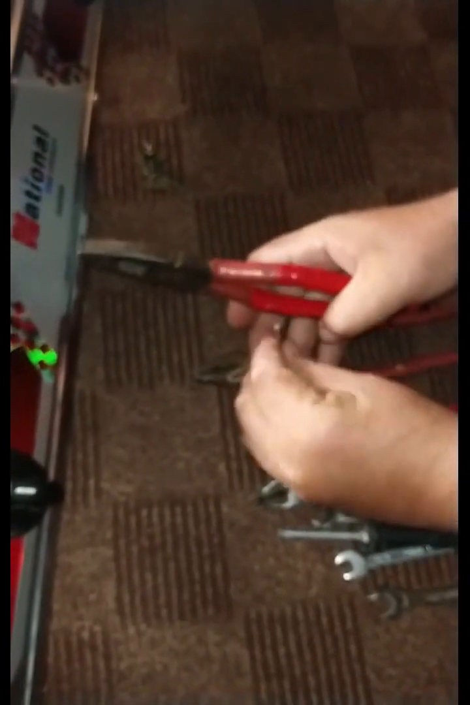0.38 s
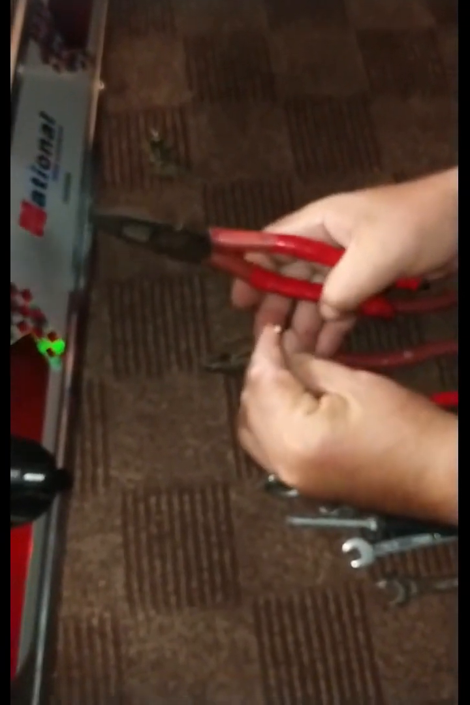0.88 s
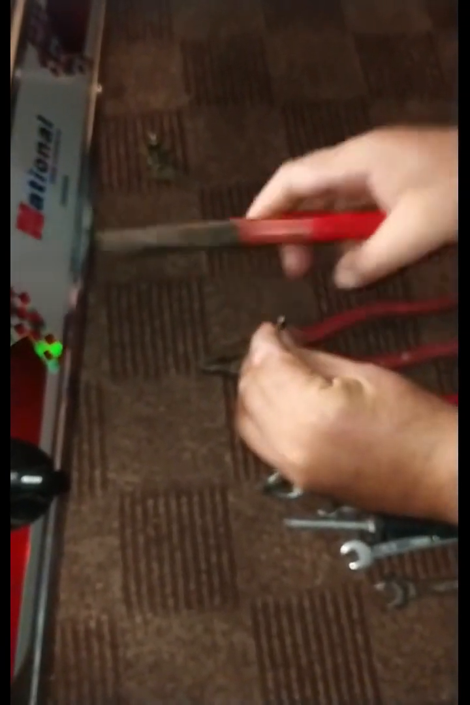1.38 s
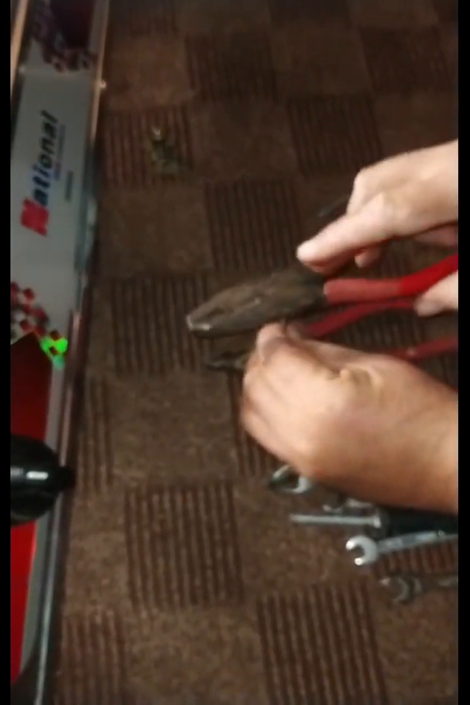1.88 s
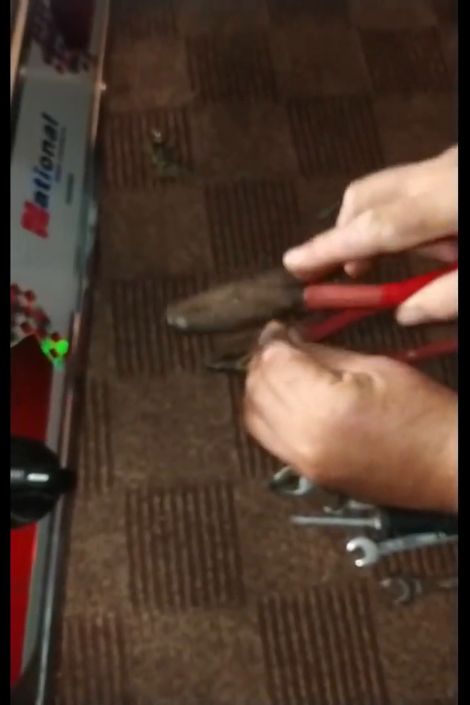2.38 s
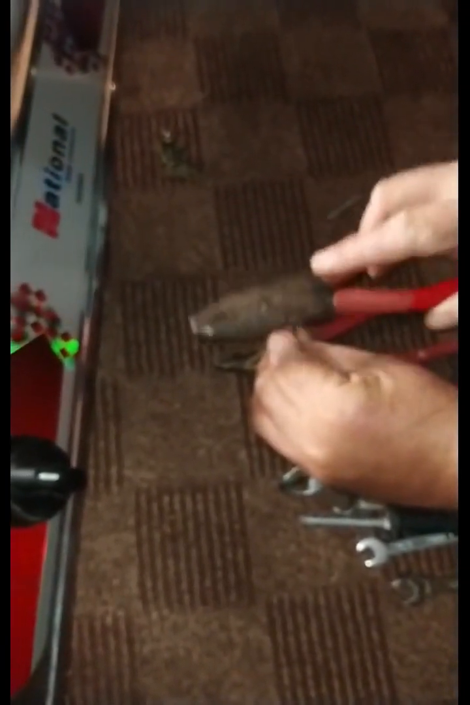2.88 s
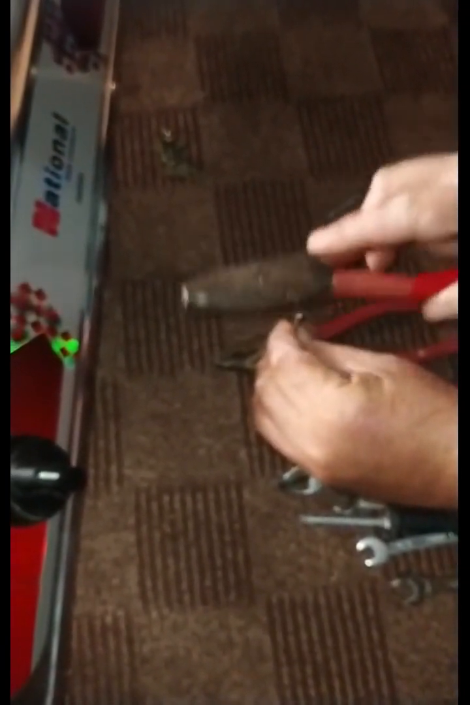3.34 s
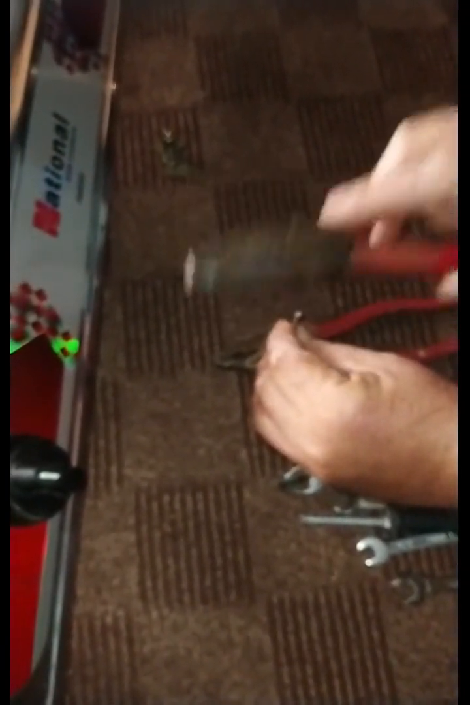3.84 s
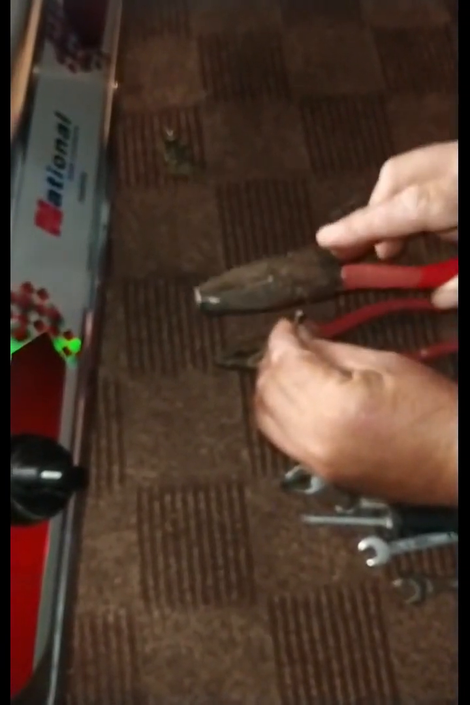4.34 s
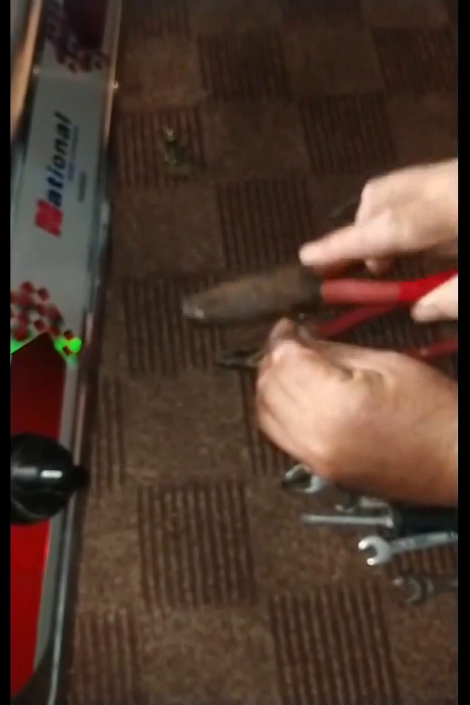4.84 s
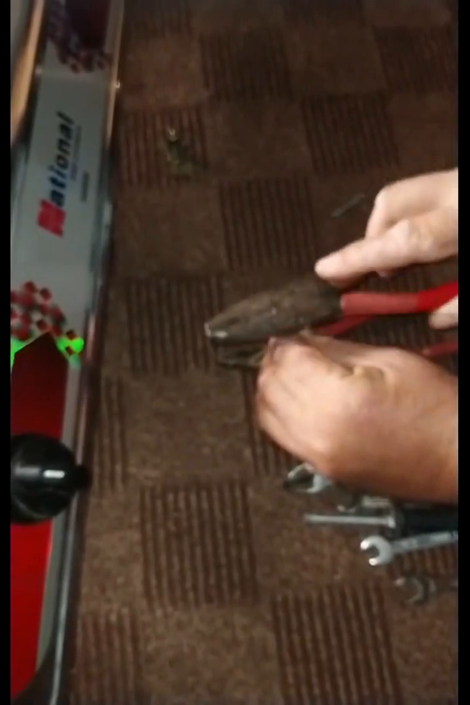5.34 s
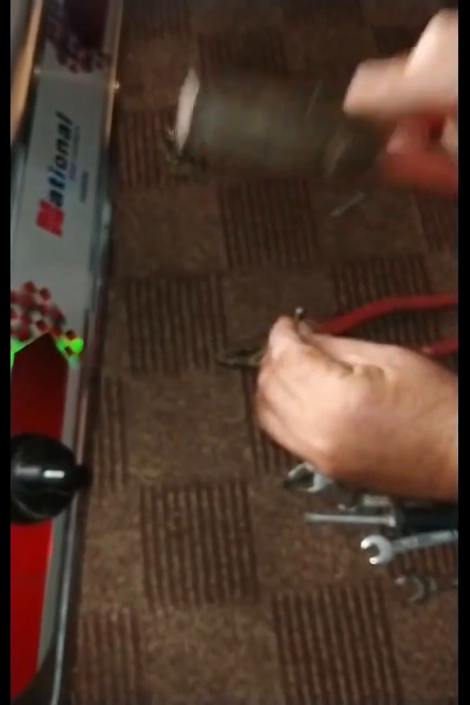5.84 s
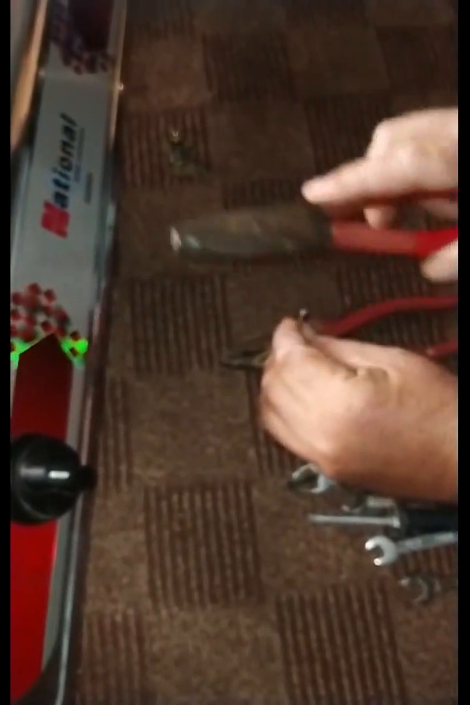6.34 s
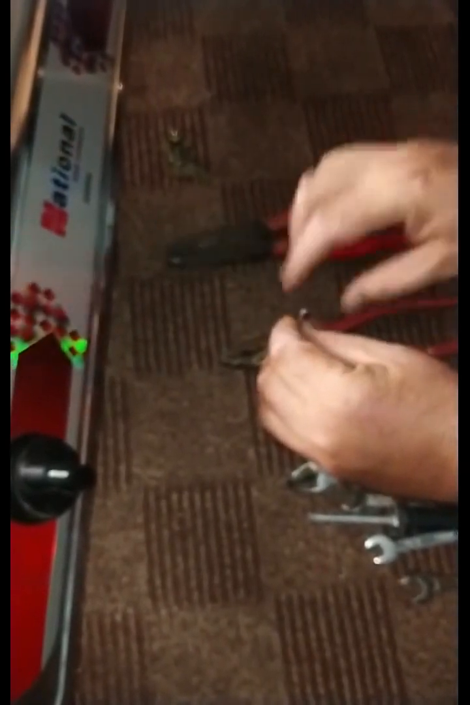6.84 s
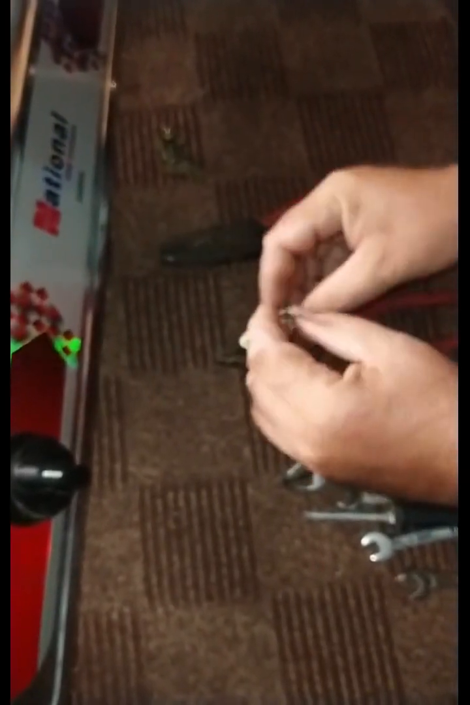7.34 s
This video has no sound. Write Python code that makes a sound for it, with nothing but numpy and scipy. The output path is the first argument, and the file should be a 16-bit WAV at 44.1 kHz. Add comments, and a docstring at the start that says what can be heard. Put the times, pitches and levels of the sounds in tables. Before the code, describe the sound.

Indoors, close to a phone, steel pliers strike a nail held on a metal part lying on carpet. After two quiet seconds with barely audible ticks come a few moderate taps, then four hard cracks about a second apart with weaker contacts between. Each has a dry floor thump, short steel ring and loose rattle. Finally the tool is put down with a clink and faint finger rubbing. A soft fan rumbles throughout.

```python
"""A fan rumbles and hums elsewhere in the building: shaped noise that breathes, with narrow noise bands.
Then steel pliers touch and tap a nail held upright on a metal part on a carpeted floor, close to a phone:
decaying modes of floor and steel, with a noisy crack and a rattle of loose parts.
Handling of pliers and parts adds small ticks, dull knocks and rubbing (bursts and strokes of noise);
ceiling and walls answer with discrete echoes and a diffuse tail."""
import sys
import numpy as np
from scipy import signal
from scipy.fft import rfft, irfft, next_fast_len
from scipy.io import wavfile
from scipy.ndimage import map_coordinates

SR = 44100
rng = np.random.default_rng(int(sys.argv[2]) if len(sys.argv) > 2 else 0)


def unload_wav(signal):
    """Save mono or channel-first audio to the path in sys.argv[1] as 16-bit WAV at rate SR, clipped to [-1, 1]."""
    wavfile.write(
        sys.argv[1],
        SR,
        np.round(np.clip(np.atleast_2d(signal).T, -1, 1) * 32767).astype(np.int16),
    )


def voltage_ratio(decibels):
    """Convert decibels (scalar or array-like) to amplitude ratios, 20 dB per decade."""
    exponent = np.asarray(decibels, float) / 20
    return 10 ** exponent


N = 329307  # length in samples
CONTACT_T = np.arange(SR // 8) / SR  # time after a contact, s


def unit(x):
    """Energy normalisation: scale to rms 1."""
    return x / np.sqrt(np.mean(x ** 2) + 1e-20)


def along(points, hz):
    """Logarithmic frequency scale: read (f/Hz, value) points, straight between them in log f."""
    f, v = np.transpose(points)
    return np.interp(np.log(hz + 1), np.log(f + 1), v)


def level(rows):
    """Amplitude envelope: gain per sample from (t/s, level/dB) rows, -120 dB outside them."""
    s, db = np.transpose(rows)
    return voltage_ratio(np.interp(np.arange(N) / SR, s, db, -120, -120))


def wobble(rate):
    """Slow random modulation: a smooth curve through rate random knots a second."""
    knots = rng.standard_normal(int(N * rate / SR) + 4)
    return map_coordinates(knots, [np.arange(N) * rate / SR])


def filtered(x, response):
    """Linear filtering: the spectrum of x times a response of frequency."""
    m = next_fast_len(len(x) + 8192)
    spectrum = rfft(x, m) * response(np.fft.rfftfreq(m, 1 / SR))
    return irfft(spectrum, m)[:len(x)]


def ringing(hz, gain, t60, t):
    """Modal superposition: a sum of exponentially decaying sines."""
    decay = voltage_ratio(-60 * t / t60[:, None])
    return gain @ (decay * np.sin(2 * np.pi * hz[:, None] * t))


# slow course of the air rumble: (t/s, level/dB), before its random breathing
FAN_LEVEL = [(0, -46), (2, -46.5), (3.6, -45), (7.47, -44.5)]
# relative spectrum of the air rumble: (f/Hz, level/dB per Hz)
AIR_SPECTRUM = [(18, -73), (30, -41.5), (55, -17.5), (107, -4.5), (201, -1.5), (261, -10), (298, -6.5),
                (323, -11), (467, -2.5), (608, -7), (772, -7), (1270, -14), (2300, -25), (3500, -33),
                (4050, -39), (7500, -46.5), (11400, -57.5), (16500, -64)]
# narrow hums: (f/Hz, rms level/dB, half-width at half amplitude/Hz)
HUMS = [(195, -60, 4), (441, -59, 17), (1084, -79.5, 8.8)]


def fan():
    """Broadband flow noise with slow amplitude modulation, and narrow-band noise heard as unsteady hums."""
    air = unit(filtered(rng.standard_normal(N), lambda hz: voltage_ratio(along(AIR_SPECTRUM, hz))))
    breathing_db = -0.5 + 0.48 * wobble(2.5) + 1.3 * wobble(19)
    out = air * level(FAN_LEVEL) * voltage_ratio(breathing_db)
    for hz, db, width in HUMS:
        hum = filtered(rng.standard_normal(N), lambda f: 1 / (1 + ((f - hz) / width) ** 2))
        out += voltage_ratio(db) * unit(hum)
    return out


TILT_HZ = 6000  # pivot of the brightness tilt
RING_OCTAVES, RING_DB = 0.27, 5.5  # 1/e half-width and height of the strongest ring


def steel_colour(ring_db, tilt, ring_hz):
    """Position-dependent excitation: where the blow lands favours one ring; returns dB as a function of Hz."""
    def colour(hz):
        hz = np.clip(hz, 2500, 14000)
        peak = np.exp(-(np.log2(hz / ring_hz) / RING_OCTAVES) ** 2)
        return ring_db + tilt * np.log2(hz / TILT_HZ) + RING_DB * peak
    return colour


# modes of pliers, nail and part: (f/Hz, level/dB added to the colour of the contact, t60/s)
STEEL_MODES = [(2764, -22.5, 0.029), (3043, -14, 0.014), (3530, -20.5, 0.017), (4790, -22.5, 0.024),
               (5370, -29.5, 0.024), (5360, -18, 0.02), (6210, -21, .012), (7000, -25.5, 0.0064),
               (7400, -24.5, 0.017), (8250, -26.5, 0.0064), (10080, -22, 0.009), (10600, -39, 0.016),
               (14900, -30.5, .009)]


def steel_ring(colour):
    """Modal vibration of steel: repeated micro-contacts excite the same decaying modes anew."""
    hz, db, t60 = np.transpose(STEEL_MODES)
    late = np.maximum(CONTACT_T - 0.0005, 0)  # the steel lets go just after the push
    sign = rng.choice([-1, 1], len(hz))
    strength = sign * voltage_ratio(db + colour(hz) + rng.normal(0, 0.5, len(hz)))
    # micro-contacts inside the first milliseconds smear the attack
    chatter = rng.standard_normal(200) * voltage_ratio(-60 * CONTACT_T[:200] / 0.004)
    chatter[0] += 9  # the main contact
    chatter /= np.linalg.norm(chatter)
    return np.convolve(ringing(hz, strength, t60, late), chatter)[:len(CONTACT_T)]


# broad humps of the crack: (f/Hz, level/dB added to the colour of the contact)
CRACK_HUMPS = [(1300, -45), (1900, -15), (3000, -10.5), (4000, -13.5), (5300, -11.5), (6400, -13),
               (9000, -16), (12200, -18.5), (14500, -19.5), (17000, -34)]


def crack_response(colour):
    """Spectral envelope of dense modes: the colour of the contact plus broad humps, as gain over Hz."""
    return lambda hz: voltage_ratio(colour(hz) + along(CRACK_HUMPS, hz))


def steel_crack(humps):
    """High modal density: countless short modes between the strong ones merge into a decaying noise."""
    t = CONTACT_T
    onset = 1 - np.exp(-(t / 0.00063) ** 2)
    noise = rng.standard_normal(len(t)) * voltage_ratio(-60 * t / 0.022) * onset
    return filtered(noise, humps)


# each contact of pliers on nail: (t/s, floor thump level/dB, steel level/dB,
# brightness/dB per octave, strongest ring f/Hz)
BLOWS = [(2.1000, -27, -28, 3.5, 5600), (2.478, -11.5, -16, 5.5, 7000), (2.4814, -49, -14, -0.5, 7000),
         (2.9488, -18.5, -18, 1.5, 3000), (2.951, -34.5, -18.5, -4.5, 2950), (2.953, -26, -26.5, 4, 5200),
         (3.3941, -1.5, -4, 0, 5330), (3.4263, -22, -18.5, -0.5, 3000), (4.0851, -2.5, -2, 1.5, 6210),
         (4.0867, -33, -7.5, -1.5, 3470), (4.9620, -4, -1.5, -0.5, 5330), (5.5104, -30, -38.5, -2, 3000),
         (5.7436, -31.5, -33, -2, 7000), (6.2943, -1, -4.5, 2, 5170)]
# steel touching steel in the hand, off the floor: (t/s, steel level/dB, brightness/dB per octave,
# strongest ring f/Hz)
TOUCHES = [(0.403, -47, -5, 3100), (.648, -47, 0, 3400), (6.8682, -20, 4.5, 7300), (7.182, -30, -7.5, 3590)]


def contacts():
    """Impact excitation and directivity: returns the sound at the phone and the less tonal sound to the room."""
    near, away, t = np.zeros(N + SR), np.zeros(N + SR), CONTACT_T
    impacts = [(*blow, 1) for blow in BLOWS]
    impacts += [(s, -120, *rest, 0) for s, *rest in TOUCHES]
    for s, thump_db, ring_db, tilt, ring_hz, on_floor in impacts:
        colour = steel_colour(ring_db, tilt, ring_hz)
        humps = crack_response(colour)
        thud = floor_thud(thump_db, ring_db, on_floor)
        ring = steel_ring(colour)
        # summed over all directions the crack is an even click
        click = filtered(1. * (np.arange(len(t)) == 60), humps)
        start = round(s * SR)
        near[start:][:len(t)] += thud + ring + steel_crack(humps) + rattle(thump_db, humps)
        # harder blows drive more of the floor and carry further
        reach = voltage_ratio(0.46 * thump_db)
        away_thud = reach * voltage_ratio(7.5) * thud * voltage_ratio(-60 * t / 0.011)
        away_click = voltage_ratio(20.5 + 0.15 * ring_db) * click
        away[start:][:len(t)] += away_thud + voltage_ratio(-23.5) * ring + away_click
    return near[:N], away[:N]


# decay of the diffuse tail: (f/Hz, t60/s)
ROOM_DECAY = [(100, 0.53), (260, 0.7), (700, 0.22), (1800, .27), (5500, 0.35), (13000, 0.29)]
# gain of the whole room answer: (f/Hz, level/dB)
ROOM_GAIN = [(60, -6), (150, 0.5), (350, -6), (800, -7), (1500, -10.5), (2200, -4.5), (3000, -5),
             (4200, -12.5), (6000, -14), (8000, -16.5), (11000, -17.5), (15000, -29)]
# first echoes: (delay t/s, level/dB against a tail of unit energy)
WALL_ECHOES = [(0.0113, -18), (0.0195, -6), (.0222, -12), (0.025, -19)]
# the rooms beyond keep the lower tones longer
LINGER_DB, LINGER_T60_S, LINGER_HZ = -15.5, 1.2, 1500


def room(x):
    """Early reflections and diffuse reverberation: a tail that builds up, then decays at a rate set by frequency.
    The tail is redrawn for each third of a second of sound."""
    out, step = np.zeros(N + 3 * SR), SR // 3
    for start in range(0, N, step):
        hz, t, z = signal.stft(rng.standard_normal(SR), SR, nperseg=256)
        decay = voltage_ratio(-60 * t / along(ROOM_DECAY, hz)[:, None])
        linger = voltage_ratio(LINGER_DB - 60 * t / LINGER_T60_S) / (1 + (hz[:, None] / LINGER_HZ) ** 2)
        tail = signal.istft(z * (decay + linger), SR, nperseg=256)[1]
        tail = tail * (1 - np.exp(-(np.arange(len(tail)) / SR / 0.0075) ** 2))  # build-up
        tail = tail / np.linalg.norm(tail)
        for delay, db in WALL_ECHOES:
            tail[round(delay * SR)] += voltage_ratio(db)
        answer = signal.fftconvolve(x[start:start + step], tail)
        out[start:start + len(answer)] += answer
    return filtered(out[:N], lambda hz: voltage_ratio(along(ROOM_GAIN, hz)))


# small ticks and dull knocks around the handling of pliers and parts:
# (t/s, peak level/dB, centre f/Hz, t60/s before the filter)
TICKS_AND_KNOCKS = [(0.914, -59, 8500, 0.007), (.962, -62, 7000, 0.0089), (2.225, -66, 11900, 0.012),
                    (5.7427, -29, 910, 0.014), (6.888, -33, 1000, 0.0083), (6.9, -46, 5270, 0.029),
                    (6.902, -50, 2870, 0.069), (6.9369, -38, 5000, 0.008), (6.944, -50, 2850, 0.049),
                    (6.971, -53, 6550, 0.0074), (7.040, -61, 3970, .015), (7.054, -56, 6500, 0.01),
                    (7.207, -69, 7000, 0.0071)]


def handling_ticks():
    """Time-bandwidth reciprocity: decaying noise ticks and knocks, narrower in band the longer they ring."""
    out, t = np.zeros(N + SR), np.arange(SR // 20) / SR
    for s, db, hz, t60 in TICKS_AND_KNOCKS:
        tick = rng.standard_normal(len(t)) * voltage_ratio(-60 * t / t60)
        tick = filtered(tick, lambda f: np.exp(-(np.log((f + 1) / hz) * t60 / 0.0018) ** 2))
        out[round(s * SR):][:len(t)] += voltage_ratio(db) * tick / np.abs(tick).max()
    return out[:N]


# floor under the part: (f/Hz, level/dB added to that of the blow, t60/s, direction of first swing)
FLOOR_MODES = [(141, -20, 0.12, -1), (238, -3, 0.011, 1), (308, -11.5, 0.063, -1), (430, -19, 0.137, -1),
               (520, -6.5, 0.017, -1), (604, -32.5, 0.066, 1), (733, -36, 0.46, 1), (825, -19, 0.033, -1),
               (1144, -18.5, 0.025, 1), (1304, -9, 0.0096, 1), (1521, -16.5, 0.019, 1)]
KNOCK_HZ = 800  # from here up the floor modes answer both the push and the sharp contact
KNOCK_OVER_THUMP_DB, KNOCK_OVER_STEEL_DB = -0.5, -3


def floor_thud(thump_db, ring_db, on_floor):
    """Modal response to an impulse: each push starts the floor modes the same way; carpet damps the treble."""
    hz, db, t60, swing = np.transpose(FLOOR_MODES)
    knock_db = max(thump_db + KNOCK_OVER_THUMP_DB, ring_db + KNOCK_OVER_STEEL_DB)
    drive_db = np.where(hz < KNOCK_HZ, thump_db, knock_db)
    push = on_floor * np.sign(swing) * voltage_ratio(db + drive_db)
    carpet = signal.butter(2, 2600 / (SR / 2))  # low-pass, Hz
    return signal.lfilter(*carpet, ringing(hz, push, t60, CONTACT_T))


# loose parts jump after a full blow; the level is added to that of the thump and the crack colour
RATTLE_DB, RATTLE_T60_S, RATTLE_PER_S, RATTLE_TOP_HZ = 3.5, 0.16, 970, 7000


def rattle(thump_db, humps):
    """Random impact process: sparse impulses of decaying size, coloured as the crack but duller."""
    t = CONTACT_T
    jumps = (rng.random(len(t)) < RATTLE_PER_S / SR) * rng.standard_normal(len(t))
    jumps = jumps * voltage_ratio(-60 * t / RATTLE_T60_S)
    duller = lambda hz: humps(hz) / (1 + (hz / RATTLE_TOP_HZ) ** 4)
    return voltage_ratio(RATTLE_DB + thump_db) * filtered(jumps, duller)


# fingers rubbing the parts: (t/s at which the rise ends, hold/s, level/dB)
RUB_STROKES = [(6.87, 0.033, -59.5), (7.03, 0.14, -65.5)]
# relative spectrum of the rubbing: (f/Hz, level/dB per Hz)
RUB_SPECTRUM = [(800, -22), (1500, 5), (2400, 0), (3800, 5), (7000, -4), (13000, -41), (17000, -38)]
RUB_RISE_S, RUB_FADE_S = 0.016, 0.038  # linear rise, 1/e time of the fade


def finger_rub():
    """Friction noise: grainy coloured noise under strokes that rise, hold and fade."""
    grain = rng.standard_normal(N) * voltage_ratio(2.5 * wobble(150))
    rub = unit(filtered(grain, lambda hz: voltage_ratio(along(RUB_SPECTRUM, hz))))
    t, strokes = np.arange(N) / SR, np.zeros(N)
    for s, hold, db in RUB_STROKES:
        rise = np.clip((t - s) / RUB_RISE_S + 1, 0, 1)
        fade = np.exp(-np.maximum(t - s - hold, 0) / RUB_FADE_S)
        strokes += voltage_ratio(db) * rise * fade
    return strokes * rub


def scene():
    """Superposition: the fan, the work at hand and the answer of its room add linearly."""
    near, away = contacts()
    handling = handling_ticks() + finger_rub()
    answer = room(away + voltage_ratio(-9.0) * handling)
    return (fan() + near + handling + answer)[None]


def band_limit(x):
    """A steep low-pass at the top of the band."""
    return signal.sosfilt(signal.butter(12, 17030, fs=SR, output="sos"), x)


def record(dry):
    """Saturation and band limiting: the phone's input rounds the peaks, then loses deep bass and top treble."""
    top = 1  # amplitude at which the input saturates
    saturated = dry[0] / (1 + np.abs(dry[0] / top) ** 4) ** (1 / 4)
    bass_cut = signal.butter(2, 55 / (SR / 2), "high")
    heard = signal.lfilter(*bass_cut, saturated)
    heard = filtered(heard, lambda hz: np.clip((16900 - hz) / 900, 0, 1))  # fades out from 16000 to 16900 Hz
    return band_limit(heard[None])


dry = scene()
out = record(dry)
unload_wav(out)
```